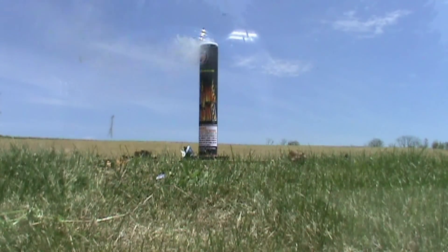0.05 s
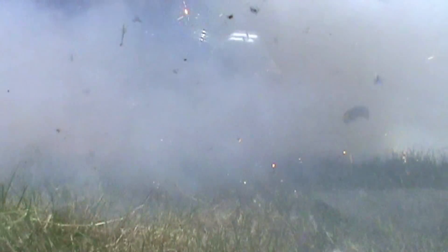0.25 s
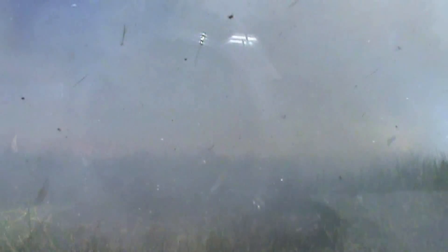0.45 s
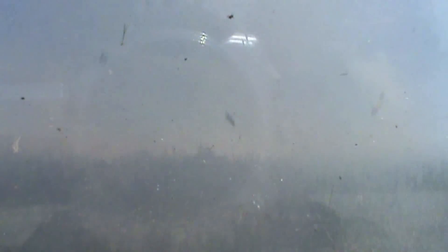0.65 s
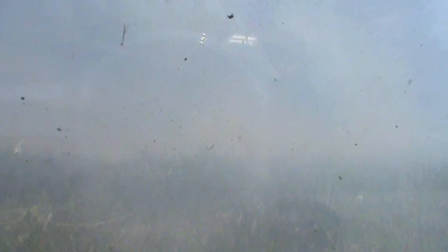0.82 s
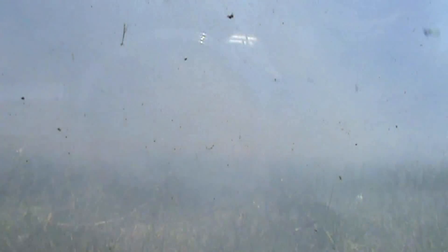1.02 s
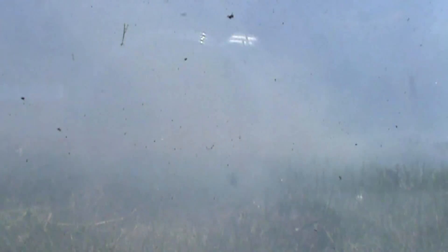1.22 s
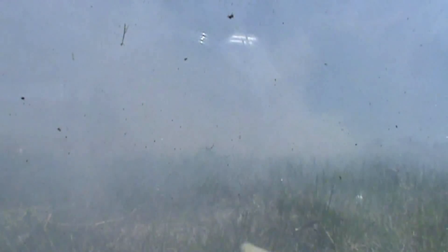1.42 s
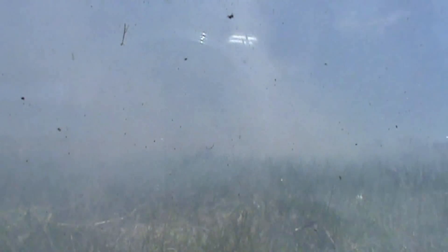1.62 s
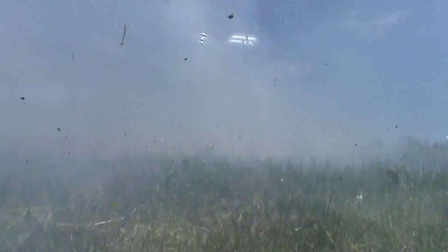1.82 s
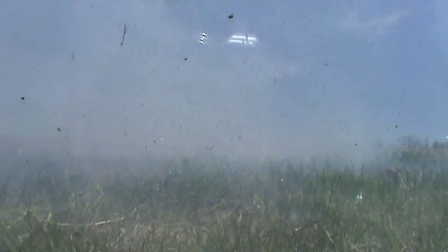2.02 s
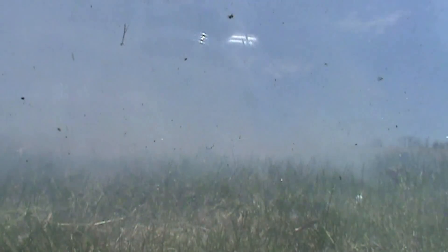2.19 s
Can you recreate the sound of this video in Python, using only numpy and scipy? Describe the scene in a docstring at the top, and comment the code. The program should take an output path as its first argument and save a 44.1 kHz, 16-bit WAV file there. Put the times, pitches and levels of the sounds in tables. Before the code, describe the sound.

A loud firework blast, followed by a hissing roar, crackling sparks and knocks of debris.

```python
"""A fuse hisses and hums in the cardboard of a firework tube in an open field; then the tube bursts close by.
The scattered charge burns off with a fluttering, turbulent roar and a hiss that dulls as it dies.
Grains crack in tiny shocks, sparks sizzle, and debris sets the microphone housing ringing.
A limiter ducks the level after each loud crack."""
import sys
import numpy as np
from scipy import signal
from scipy.fft import rfft, irfft
from scipy.io import wavfile
from scipy.ndimage import uniform_filter1d, minimum_filter1d

SR = 44100
rng = np.random.default_rng(int(sys.argv[2]) if len(sys.argv) > 2 else 0)


def inscribe(sig):
    """Save sig as 16-bit PCM at rate SR to the path in sys.argv[1].

    A 1-D sig is mono; a 2-D sig holds one channel per row.
    Samples are clipped to [-1, 1] before scaling.
    """
    pcm = np.round(np.clip(np.atleast_2d(sig).T, -1, 1) * 32767)
    wavfile.write(sys.argv[1], SR, pcm.astype(np.int16))


N = 103635
T = np.arange(N) / SR
BLAST_S, SPLINTER_T60_S = 0.2116, 0.0062

# Spectrum of the tearing tube and the spit of gas. Each row: frequency in Hz, relative density in dB.
CRASH_SPECTRUM = [(300, -28), (900, 2.5), (2800, 5), (5000, -0.5), (8000, 2.5), (15500, -14.5)]


def from_db(db):
    """Amplitude grows tenfold for every 20 dB."""
    return 10 ** (np.asarray(db) / 20)


def rms_one(x):
    """Normalisation to unit mean power."""
    return x / np.sqrt(np.mean(x ** 2) + 1e-20)


def in_time(rows):
    """Linear interpolation in time: one curve for each column after the first."""
    times, *columns = np.transpose(rows)
    return [np.interp(T, times, column) for column in columns]


def at_hz(points, hz):
    """Interpolation on a logarithmic frequency axis."""
    frequencies, values = np.transpose(points)
    return np.interp(np.log(hz), np.log(frequencies), values)


def panned(db):
    """Left and right gains for a level difference; positive favours the left."""
    return from_db(np.array([[.5], [-.5]]) * db)


def butter(x, hz, kind, order=2):
    """Causal Butterworth filter, maximally flat in its passband."""
    sections = signal.butter(order, np.minimum(hz, SR / 2 - 100), kind, fs=SR, output="sos")
    return signal.sosfilt(sections, x + 1e-18)


def drift(corner_hz):
    """Random fluctuation: low-passed Gaussian noise of unit rms."""
    hz = np.fft.rfftfreq(N, 1 / SR)
    return rms_one(irfft(rfft(rng.standard_normal(N)) / (1 + (hz / corner_hz) ** 2), N))


def dying(start, t60, hold=0):
    """Sudden onset, hold, then exponential decay of 60 dB in t60 seconds."""
    return (T >= start) * from_db(-60 * np.clip((T - start - hold) / t60, 0, 10))


def noise(spectrum, flutter_db=0, tilt_db=0):
    """Partly coherent stereo noise in third-octave bands, with one common flutter and a treble tilt."""
    # Likeness of left and right. Each row: frequency in Hz, correlation.
    likeness = [(40, 0.32), (100, 1), (250, 0.61), (500, 0.82), (1000, 0.65), (2500, 0.93), (6000, 0.56),
                (14000, 0.68)]
    tilt_from_hz, flutter_hz, left_db = 2420, 45, 1.77
    edges = 22 * 2 ** (np.arange(30) / 3)
    white = rng.standard_normal((2, 2, N))
    plain = tilted = 0
    for k, (low, high) in enumerate(zip(edges, edges[1:])):
        hz = np.sqrt(low * high)
        if not spectrum[0][0] / 2 < hz < spectrum[-1][0] * 2:
            continue
        mid, side = butter(white[k % 2], [low, high], "band")
        alike = np.clip(at_hz(likeness, hz), -1, 1)
        stereo = np.sqrt(1 + alike) * mid + np.sqrt(1 - alike) * side * [[1], [-1]]
        band = from_db(at_hz(spectrum, hz)) * stereo
        plain += band
        tilted += band * from_db(tilt_db * max(np.log2(hz / tilt_from_hz), 0))
    flutter = rms_one(from_db(flutter_db * drift(flutter_hz)))
    return tilted / np.std(plain) * flutter * panned(left_db)


def add(out, start, sound):
    """Superposition of a short sound at a start time in seconds."""
    i = int(np.clip(start * SR, 0, N - 1))
    out[:, i:i + sound.shape[1]] += sound[:, :N - i]


def blast():
    """Sudden pressure release: a hollow boom and the crash of the tearing tube saturate the microphone."""
    # The blast and a muffled after-burst.
    # Each row: start in seconds, boom gain in dB, crash gain in dB, crash cut-off in Hz.
    bursts = [(0.2125, 0, -1, 16000), (0.338, -31, -11, 2250)]
    # Spectrum of the boom. Each row: frequency in Hz, relative density in dB.
    boom_spectrum = [(30, -28), (100, -25.5), (230, 6), (450, 2), (650, -3.5), (950, -8.5), (2000, -32),
                     (6000, -51)]
    crash_delay_s, saturation = 0.0023, 0.54
    boom = noise(boom_spectrum) * sum(from_db(db) * dying(start, t60=0.34) for start, db, _, _ in bursts)
    tearing = rms_one(from_db(3.9 * drift(248))) * noise(CRASH_SPECTRUM)
    crash = 0
    for start, _, db, cutoff_hz in bursts:
        envelope = from_db(db) * dying(start + crash_delay_s, t60=0.079, hold=0.0083)
        crash += envelope * butter(tearing, cutoff_hz, "low")
    return saturation * np.tanh((boom + crash) / saturation)


def flames():
    """Turbulent combustion radiates a deep rumble and a hollow roar under the grainy hiss of powder."""
    # Envelopes of the rumble and the roar. Each row: time in seconds, level in dB.
    rumble_levels = [(.21, -21.5), (.29, -17.5), (.35, -13), (.41, -18), (.5, -23), (.535, -16.5),
                     (.595, -14.5), (.635, -15.5), (.67, -18), (.72, -17), (.79, -21), (.83, -23.5),
                     (.88, -32), (1.15, -34.5), (1.42, -39.5), (1.58, -35.5), (1.67, -31.5), (1.78, -39),
                     (1.9, -46), (2.35, -43)]
    roar_levels = [(.21, -46), (.32, -21.5), (.4, -26.5), (.51, -18), (.56, -22.5), (.63, -22.5),
                   (.7, -20.5), (.8, -28.5), (.9, -23), (1.05, -28.5), (1.2, -36), (1.35, -40),
                   (1.56, -36.5), (1.64, -38.5), (1.78, -40), (1.92, -51), (2.15, -51), (2.35, -49.5)]
    # Course of the hiss. Each row: time in seconds, level before tilt in dB, treble tilt in dB per octave.
    burn = [(.21, -17.5, 1), (.25, -42, .5), (.29, -29, 1.5), (.34, -34, 7), (.38, -20.5, 4.5),
            (.45, -15, -1.5), (.52, -19, -5), (.6, -21, -8.5), (.72, -22.5, -8.5), (.77, -18, -8.5),
            (.795, -24, -5), (.83, -24.5, -6), (.885, -33, -0.5), (.95, -23.5, 0.5), (1.03, -26.5, 0.5),
            (1.1, -26.5, 1), (1.16, -33, 2), (1.195, -25.5, 1.5), (1.25, -26.5, 2), (1.32, -28.5, 1),
            (1.37, -28.5, -2.5), (1.41, -27.5, -1), (1.5, -32.5, -7.5), (1.62, -36, -10), (1.76, -42, -17),
            (1.92, -48.5, -22.5), (2.12, -55, -31), (2.35, -55.5, -23)]
    # Spectra of the three layers. Each row: frequency in Hz, relative density in dB.
    rumble_spectrum = [(25, -32), (60, -9.5), (100, -0.5), (150, 2.5), (240, 3), (330, -2), (500, 0),
                       (900, -42.5)]
    roar_spectrum = [(150, -22.5), (290, 4.5), (400, -8.5), (600, 1), (800, -13.5), (1200, -17.5),
                     (2500, -33)]
    hiss_spectrum = [(400, -4), (900, -1), (1500, 1), (2200, 2), (2900, 3), (3600, -1), (5000, -2),
                     (8000, -9), (11000, -22), (15500, -42.5)]
    rumble_db, = in_time(rumble_levels)
    roar_db, = in_time(roar_levels)
    hiss_db, tilt_db = in_time(burn)
    rumble = from_db(rumble_db) * noise(rumble_spectrum, flutter_db=1.5)
    roar = from_db(roar_db) * noise(roar_spectrum, flutter_db=1.5)
    graininess = rms_one(from_db(1.5 * drift(900)))
    hiss = from_db(hiss_db) * graininess * noise(hiss_spectrum, flutter_db=1.72, tilt_db=tilt_db)
    return (T >= BLAST_S) * (rumble + roar + hiss)


def cracks():
    """Each bursting grain sends out an N-wave shock and splinters, and briefly rings the housing."""
    # Grains cracking close by. Each row: start in seconds, relative level in dB, left over right in dB.
    near_grains = [(0.7821, 7.5, -10), (0.8615, -1.5, -7), (0.8653, -4.5, 8), (.8762, -10, -11),
                   (.8848, -6, -3), (0.9021, 10.5, 4), (0.905, -14, -8.5), (0.9083, -1, -7.5),
                   (0.9146, -7, -1), (0.9198, -1.5, -2.5), (0.9249, -4, -1), (0.9303, -9, -2),
                   (0.9341, -8, 1), (0.9386, -1.5, -3.5), (0.9413, -5, -2.5), (0.9458, -1, 7),
                   (0.9503, -1, -5), (0.9538, -2.5, -5), (0.9623, -6.5, 2.5), (0.9646, 1.5, 3),
                   (0.9708, -8, -1), (0.9754, -13, 10), (0.9807, 0.5, 1), (.9849, -6, -11),
                   (0.9922, 4.5, -15), (1.0025, 7.5, 6), (1.0167, 0, -8.5), (1.027, -4, -1.5),
                   (1.0374, -10, -4), (1.0453, 1, -9), (1.0626, -1, 7), (1.0656, 1, 0.5), (1.0685, 1, -8.5),
                   (1.0839, -4, 7.5), (1.0872, -1, -7.5), (1.123, -3, 3.5), (1.1433, 8.5, 0.5),
                   (1.2673, 10.5, -3), (1.599, -25, 3)]
    # Weaker grains swarm at random, their rate a Gaussian bell in time.
    peak_s, spread_s, peak_per_s, candidates = 0.98, 0.055, 400, 200
    share = peak_per_s * spread_s * np.sqrt(2 * np.pi) / candidates
    scatter = rng.standard_normal((candidates, 3))
    chosen = scatter[rng.random(candidates) < share]
    swarm = [(peak_s + spread_s * when, -16 + 2.5 * level, 2 * pan) for when, level, pan in chosen]
    shock_s, housing_hz, housing_t60_s = 0.00037, 1050, 0.006
    out, t = np.zeros((2, N)), T[:SR // 50]
    for start, db, pan_db in near_grains + swarm:
        width = shock_s * rng.uniform(.7, 1.2)
        n_wave = (t < width) * (1 - 2 * t / width)
        shock = butter(n_wave, 3840, "high", order=1)
        splinter_noise = rng.standard_normal((2, len(t))) + rng.standard_normal(len(t))
        splinters = from_db(-17 - 60 * t / SPLINTER_T60_S) * splinter_noise
        ring_hz = housing_hz * rng.uniform(.7, 1.4)
        ring = from_db(-15 - 60 * t / housing_t60_s) * np.sin(2 * np.pi * ring_hz * t)
        add(out, start, from_db(db + 4) * panned(pan_db) * (shock + splinters + ring))
    return butter(butter(out, 576, "high", order=1), 10200, "low")


def knocks():
    """Impacts excite a damped resonance of the housing; soft ones are duller, heavy ones also thud."""
    # Debris strikes. Each row: start in seconds, knock gain in dB, ring frequency in Hz, thud level in dB.
    impacts = [(0.829, -7, 278, -36.5), (.8515, -6.5, 463, -38), (.966, -3.5, 207, -2),
               (.9803, 2, 520, -6.5), (1.0195, -3.5, 553, -35.5), (1.0454, -7, 470, -35),
               (1.0575, -10, 570, -48), (1.0605, -4, 560, -36), (1.0682, -15, 565, -29),
               (1.108, -6, 594, -26.5), (1.1262, -9.5, 640, -35.5), (1.1295, -7.5, 553, -38),
               (1.1578, -7.5, 600, -29.5), (1.644, -20, 450, -45), (1.762, -20.5, 285, -60),
               (2.245, -34.5, 331, -55.5), (2.31, -35.5, 480, -53.5)]
    ring_t60_s, rise_s, thud_hz, thud_t60_s = 0.011, 0.00017, 85, 0.013
    out, t = np.zeros((2, N)), T[:SR // 10]
    for start, db, hz, thud_db in impacts:
        stereo_hz = hz * (1 + .04 * rng.standard_normal((2, 1)))
        envelope = from_db(-60 * t / ring_t60_s) * (1 - np.exp(-t / rise_s))
        ring = 2 * envelope * np.sin(2 * np.pi * stereo_hz * t)
        contact = butter(rng.standard_normal((2, len(t))), 4000, "low", order=1)
        tick = contact * from_db(-7 + db / 2 - 60 * t / SPLINTER_T60_S)
        thud = np.sin(2 * np.pi * thud_hz * t) * from_db(thud_db - 60 * t / thud_t60_s)
        add(out, start, from_db(db) * butter(ring + tick, hz / 2, "high", order=1) + thud)
    return out


def sparks():
    """Amplitude-modulated noise: the fine sizzle of the spark shower and one narrow-band spit of gas."""
    # Envelope of the sizzle. Each row: time in seconds, level in dB.
    sizzle_levels = [(.21, -29), (.29, -34.5), (.38, -28), (.55, -34), (.7, -35.5), (.76, -32), (.84, -31),
                     (.89, -44), (.96, -26), (1.05, -36), (1.14, -39.5), (1.22, -54), (1.5, -88)]
    # Spectrum of the sizzle. Each row: frequency in Hz, relative density in dB.
    sizzle_spectrum = [(4000, -17), (7000, 1.5), (10000, 1), (13000, 0), (15500, -9.5)]
    spit_s, spit_half_width_s, spit_hz = 0.316, 0.011, 4570
    gas = rms_one(butter(noise(CRASH_SPECTRUM), [spit_hz / 1.09, spit_hz * 1.1], "band"))
    spit = from_db(-25.5) * gas * np.exp(-((T - spit_s) / spit_half_width_s) ** 2)
    sizzle_db, = in_time(sizzle_levels)
    sizzle = (T >= BLAST_S) * from_db(sizzle_db) * noise(sizzle_spectrum, flutter_db=2.3)
    return sizzle + spit


def fuse():
    """Jet noise: the fuse hisses and, blowing across the tube, drives its resonance until the blast."""
    # Spectrum of the jet. Each row: frequency in Hz, relative density in dB.
    jet_spectrum = [(30, -25.5), (60, -15.5), (115, -7.5), (270, -21.5), (400, -4.5), (520, -11.5),
                    (700, -27.5), (1150, -37.5), (1500, -19), (2800, -19.5), (3600, -30.5), (5000, -34.5),
                    (15500, -42.5)]
    # Resonances of the jet and the tube. Each row: centre in Hz, bandwidth in Hz, level in dB.
    jet_resonances = [(2920, 160, -48.5), (8730, 1100, -64.5)]
    tube_resonance = (398, 55, -42)
    tones = 0
    for hz, width, db in [tube_resonance] + jet_resonances:
        band = butter(noise(jet_spectrum), [hz - width / 2, hz + width / 2], "band", order=1)
        tones += from_db(db) * rms_one(band)
    hiss = from_db(-41.5) * noise(jet_spectrum)
    return (T < BLAST_S) * (hiss + tones)


def field_air():
    """Ambient noise of the open field: faint, steady and strongest in the bass."""
    # Spectrum of the air. Each row: frequency in Hz, relative density in dB.
    air_spectrum = [(30, 3), (100, 5.5), (500, -8.5), (1000, -18.5), (4000, -22), (15500, -27)]
    return from_db(-57) * noise(air_spectrum)


def ports(x):
    """Phase difference: the left microphone port leads the right; neither passes the deepest bass."""
    # Lead of the left port. Each row: frequency in Hz, phase in radians.
    phase_lead = [(30, 0.15), (120, 0.36), (280, 1.24), (850, 1.47), (1500, 1.12), (2800, 1.17),
                  (5000, 0.48), (11000, 0.44)]
    radians = at_hz(phase_lead, np.fft.rfftfreq(2 * N, 1 / SR) + 1)
    rotation = np.exp(.5j * radians * np.array([[1], [-1]]))
    shifted = irfft(rfft(x, 2 * N) * rotation)[:, :N]
    return butter(shifted, 22, "high")


def scene():
    """Superposition of all sources at the two microphone ports."""
    return ports(fuse() + blast() + flames() + sparks() + field_air() + knocks() + cracks())


def record(dry):
    """Look-ahead limiting: the gain dips at peaks and soon recovers; a steep low-pass follows."""
    threshold_db, release_db_per_s, window_samples, cutoff_hz = 2, 421, 61, 16200
    peak_db = 20 * np.log10(np.abs(dry).max(axis=0) + 1e-9)
    over_db = np.maximum(peak_db - threshold_db, 0)
    release_db = release_db_per_s * T
    held_db = np.maximum.accumulate(over_db + release_db) - release_db
    gain_db = uniform_filter1d(minimum_filter1d(-held_db, window_samples), window_samples)
    low_pass = signal.ellip(10, .1, 70, cutoff_hz, fs=SR, output="sos")
    return signal.sosfilt(low_pass, dry * from_db(gain_db))


dry = scene()
out = record(dry)
inscribe(out)
```